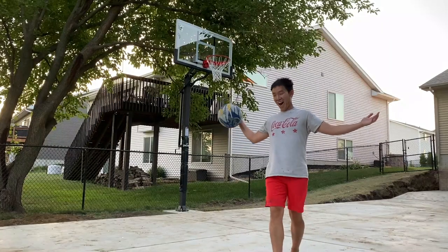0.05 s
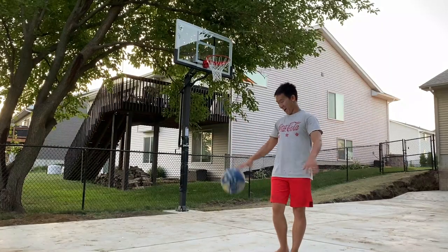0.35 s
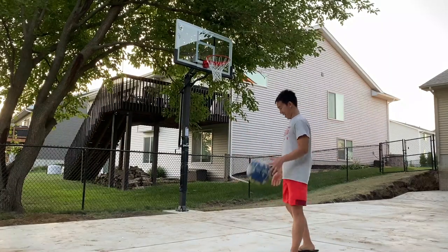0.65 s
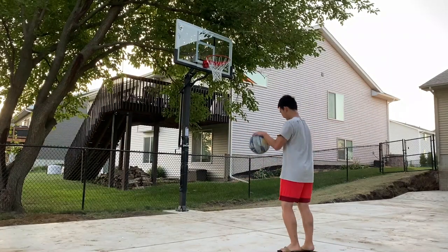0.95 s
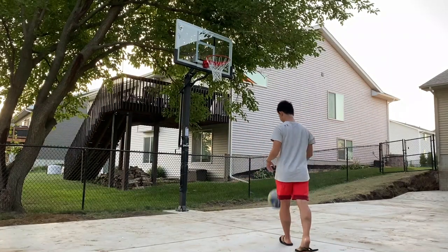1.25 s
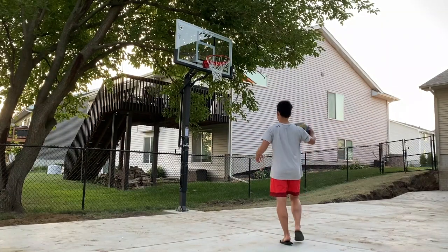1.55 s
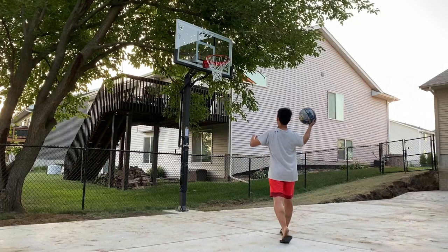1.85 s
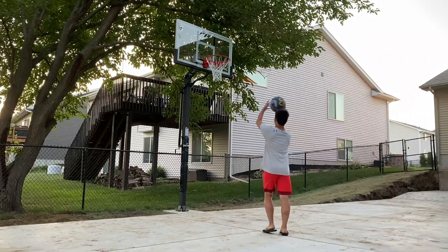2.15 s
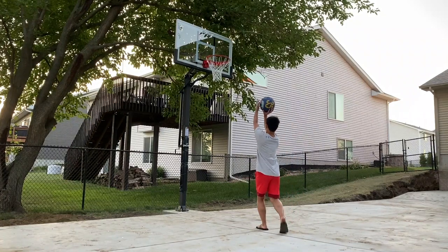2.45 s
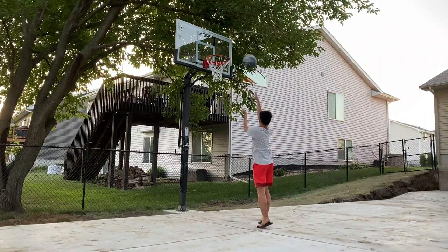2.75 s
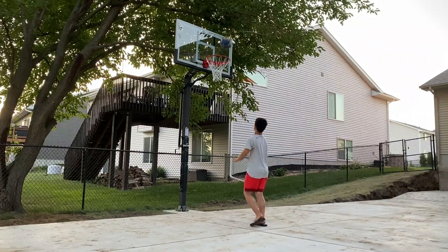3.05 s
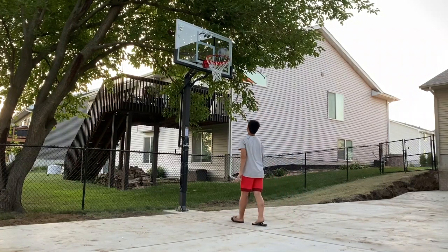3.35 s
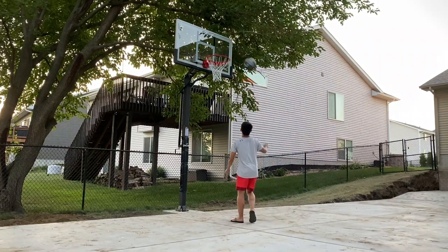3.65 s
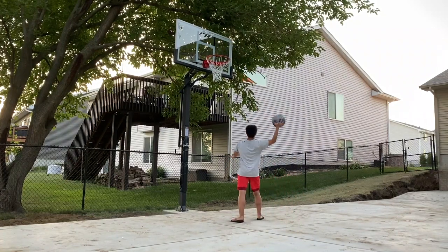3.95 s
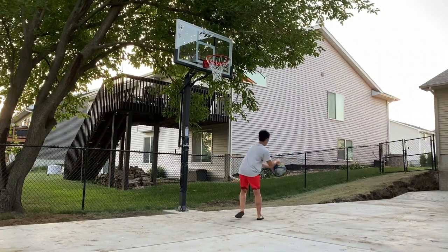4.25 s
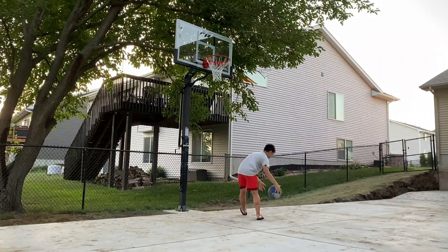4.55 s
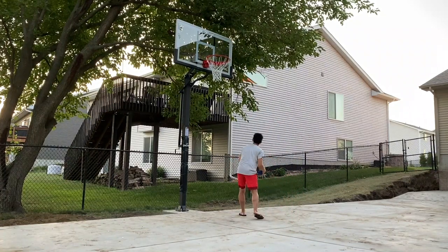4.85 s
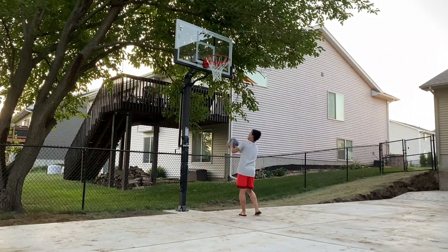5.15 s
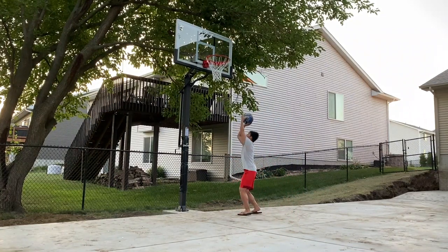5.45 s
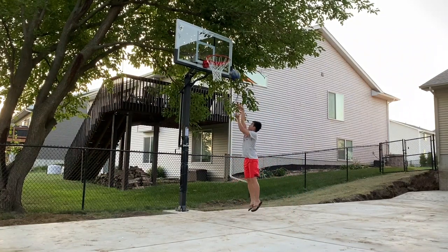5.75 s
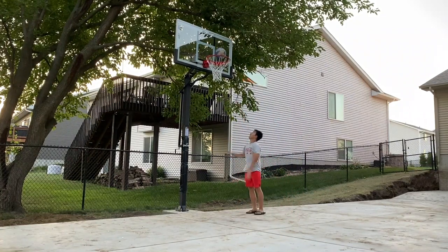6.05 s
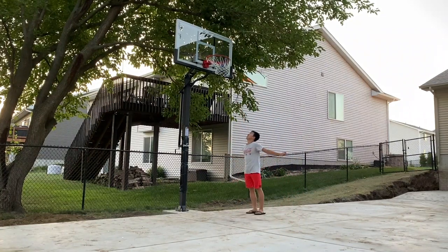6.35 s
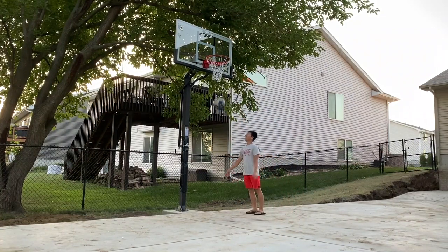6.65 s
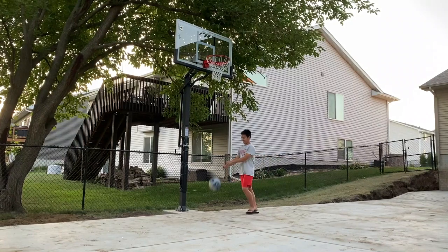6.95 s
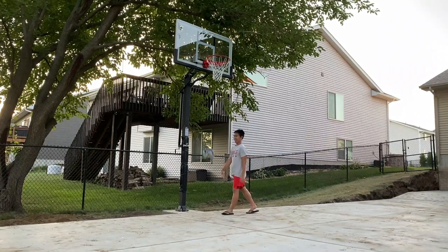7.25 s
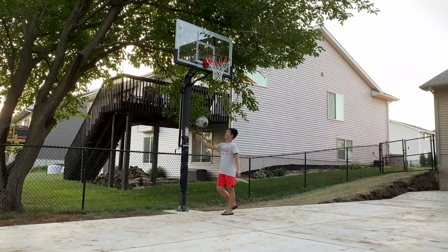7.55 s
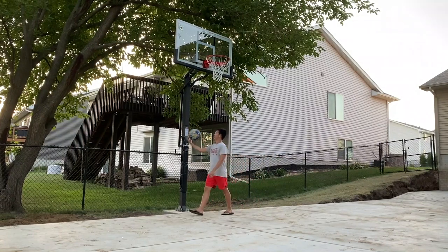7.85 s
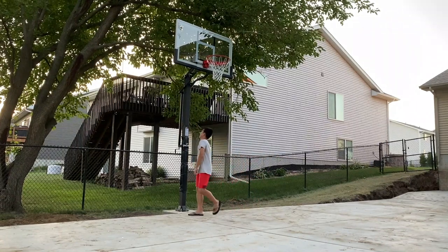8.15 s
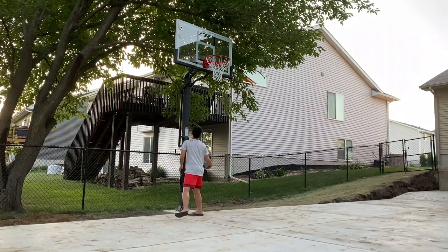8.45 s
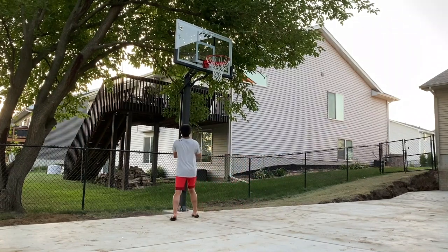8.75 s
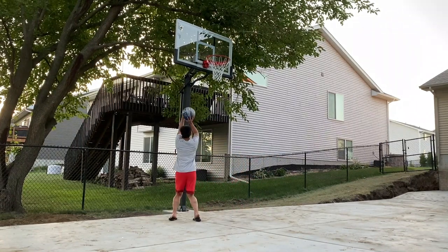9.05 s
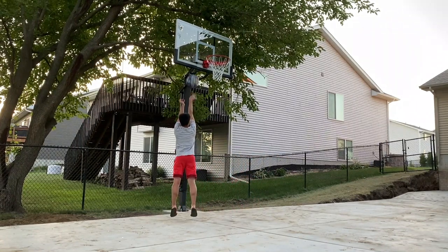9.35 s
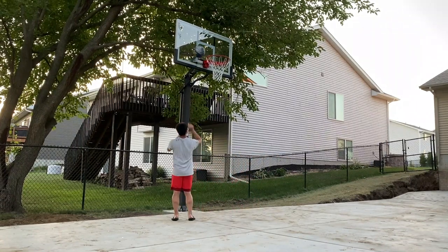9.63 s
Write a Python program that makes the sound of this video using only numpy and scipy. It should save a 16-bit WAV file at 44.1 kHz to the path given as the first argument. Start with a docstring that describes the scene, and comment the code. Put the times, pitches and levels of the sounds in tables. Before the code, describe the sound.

A basketball bounces on concrete and rattles a hoop, with sandals slapping and scuffing and a songbird whistling in a backyard.

```python
"""Back-yard basketball

A stereo microphone stands by a concrete pad, a few metres from a player who dribbles and shoots three
times. The ball cracks, thumps and rings inside; the hoop shudders and chatters; sandals slap and scuff.
House walls throw back each bounce. A songbird whistles falling notes from the trees, and behind it
lie a thin hiss of leaves, the rumble of distant traffic and one humming engine."""
import sys
import numpy as np
from scipy import signal
from scipy.fft import rfft, irfft, next_fast_len
from scipy.io import wavfile

SR = 44100
rng = np.random.default_rng(int(sys.argv[2]) if len(sys.argv) > 2 else 0)


def waveform_to_disk(signal):
    """Save audio, clipped to [-1, 1], as 16-bit WAV at the path in sys.argv[1]."""
    frames = np.transpose(np.atleast_2d(signal))
    scaled = np.clip(frames, -1, 1) * 32767
    samples = np.round(scaled).astype(np.int16)
    wavfile.write(sys.argv[1], SR, samples)


N = 436149
T = np.arange(N) / SR
BLOW = T[:SR // 2]   # time since a contact [s]

# Levels are relative within each table; the functions set the balance.
# distant traffic: (frequency [Hz], spectral density [dB])
TRAFFIC_SPECTRUM = [(13, -59), (22, -18), (30, -53), (42, -2), (91, 3), (108, -4), (139, -4), (183, -4.5),
                    (211, -9.5), (312, -23), (500, -21.5), (650, -35), (1100, -120)]
# its slow swell: (time [s], level [dB])
TRAFFIC_LEVEL = [(0, -64), (2.5, -62), (5.2, -64), (6.6, -60), (7.6, -59), (8.2, -61.5), (9.89, -58.5)]
# leaves and far hiss: (frequency [Hz], spectral density [dB])
LEAF_SPECTRUM = [(180, -24), (300, 2.5), (762, -8), (1030, -6.5), (1140, -11.5), (1720, -15), (2650, -16),
                 (3520, -8.5), (4670, -10.5), (5160, -9.5), (6300, -14.5), (7440, -25), (11300, -40),
                 (12700, -43), (16000, -64)]
# one far engine: (time [s], pitch [Hz], level [dB])
ENGINE_HUM = [(0, 112, -69), (2, 115, -61), (5, 116, -60.5), (7.5, 109.6, -64), (8.05, 97.3, -53.5),
              (8.751, 109.7, -53), (9.3, 108.7, -60.5)]

# the bird's flourish, up, down and up; a bend under 1 glides fastest at first:
# (delay [s], length [s], start [Hz], end [Hz], bend [exponent], level [dB])
FLOURISH_NOTES = [(0, .05, 4040, 5190, .6, -3), (.045, .045, 4300, 2898, .6, 0.5),
                  (.102, .05, 2850, 3850, .9, -3)]
# flourishes from the trees: (time [s], level [dB])
FLOURISH_CALLS = [(1.441, -55), (2.944, -53.5), (6.82, -55), (7.72, -63.5)]
# a chip dips and curls up: (delay [s], length [s], start [Hz], end [Hz], bend [exponent], level [dB])
CHIP_NOTES = [(0, .04, 3950, 3000, .9, -5), (.06, .065, 3100, 4050, 0.99, -1.5)]
# chips from the trees: (time [s], level [dB])
CHIP_CALLS = [(.76, -63), (2.49, -65), (5.07, -71), (6.63, -63), (9.51, -56)]
# a slur's high head and falling tail: (delay [s], length [s], start [Hz], end [Hz], bend [exponent])
SLUR_HEAD, SLUR_TAIL = (0, .36, 3831, 2850, .34), (.225, .205, 2930, 1830, 1.05)
# long slurs: (time [s], pitch [ratio], head [dB], tail [dB])
SLUR_CALLS = [(1.64, 0.98, -69.5, -63.5), (7.09, .98, -67, -63.5), (7.802, 1.03, -54, -57)]
# short falling whistles: (time [s], length [s], level [dB])
WHISTLE_CALLS = [(2.306, 0.15, -64.5), (2.674, .115, -65), (3.007, 0.14, -63), (8.406, 0.16, -57),
                 (8.733, 0.22, -58), (9.05, .2, -56.5), (9.369, 0.15, -57)]

# scatter from fence, deck and trees: (band centre [Hz], level [dB], t60 [s])
YARD_SCATTER = [(60, -11.5, 0.96), (118, -17, 0.39), (250, -16.5, .4), (496, -14.5, 0.2), (990, -18, 0.38),
                (2000, -15.5, 0.46), (3980, -14.5, .42), (7850, -7.5, 0.4), (16000, -21, .22)]
# echoes off the house walls: (delay [s], level [dB], cut-off [Hz], left over right [dB])
WALL_ECHOES = [(0.031, -28.5, 1497, 1.5), (0.044, -31, 3070, 14.5), (.055, -24.5, 1240, -10),
               (.068, -22, 925, 9.5), (.103, -26, 400, 1.5), (0.143, -52.5, 1200, 11)]
# the ball moves off towards the hoop: (time [s], distance from the microphone [m])
BALL_DISTANCE = [(.5, 3.16), (1.2, 3.9), (7, 4.5)]

# sand under a sole: (frequency [Hz], spectral density [dB])
GRIT_SPECTRUM = [(150, -43), (250, 0), (444, 2.5), (686, -5.5), (1020, -0.5), (2570, 0), (7310, -8),
                 (8400, -11), (11300, -11), (13200, -11), (14700, -13.5), (16000, -5)]
# soles dragged over grit: (time of hardest push [s], length [s], level [dB], brightness [dB])
SOLE_DRAGS = [(0.05, 0.096, -50, 7.5), (.743, .13, -56, 7.5), (2.24, .013, -53, 7),
              (2.684, 0.053, -57.5, 2.5), (3.017, .06, -61.5, 6.5), (3.285, .13, -45.5, -5.5),
              (3.525, 0.036, -61.5, -1), (3.721, 0.068, -58, 7), (3.942, 0.065, -55, 9.5),
              (4.154, 0.079, -50, 7.5), (4.776, 0.18, -62.5, 6.5), (5.264, 0.085, -53.5, 3),
              (5.347, 0.076, -41, -17), (5.551, 0.037, -46, -2), (7.924, .05, -62, 2),
              (8.031, 0.048, -61, 3), (8.572, 0.045, -58, 5), (8.696, 0.19, -56.5, -7),
              (9.014, .032, -48, 6.5), (9.516, .045, -55.5, -3)]
# the player shifts his feet: (start [s], end [s])
SHUFFLE_SPANS = [(3.4, 5.0), (8.6, 9.1)]
# sandals landing on the pad: (time [s], slap [dB], slap pitch [Hz], skid [dB])
FOOTFALLS = [(.655, -42.5, 690, -71), (1.318, -37, 470, -49.5), (1.893, -47, 1825, -61),
             (1.997, -45.5, 500, -77.5), (2.204, -43.5, 750, -71), (2.54, -39, 606, -78),
             (2.775, -49, 2090, -55.5), (2.841, -32, 1000, -48.5), (2.896, -43.5, 744, -64),
             (3.194, -37, 2620, -50.5), (3.79, -39, 1740, -63), (3.84, -48, 1890, -57),
             (4.891, -50, 2260, -70), (5.294, -34, 905, -57), (5.374, -28.5, 814, -62),
             (5.395, -28, 970, -71), (5.595, -39.5, 490, -66), (5.858, -46, 895, -63.5),
             (5.913, -34.5, 1910, -65), (8.654, -43, 427, -66.5), (8.775, -45, 2190, -61),
             (8.991, -41, 1440, -62), (9.268, -48, 1840, -60), (9.483, -39, 1360, -58.5)]

# modes of board and pole: (frequency [Hz], level [dB], t60 [s])
FRAME_MODES = [(98.24, 0.5, 0.62), (115, 4, 0.143), (165.4, -3, 0.29), (228, -0.5, 0.071),
               (309, -16.5, 0.13), (439, 3.5, 0.036)]
# modes of the rim: (frequency [Hz], level [dB], t60 [s])
RIM_MODES = [(662, 5.5, 0.065), (1050, -13, 0.17), (1183, 11, 0.053), (1500, -11, 0.094), (2070, -5, 0.062),
             (2470, 2, 0.018)]
# modes of the bracket and its springs: (frequency [Hz], level [dB], t60 [s])
BRACKET_MODES = [(2900, -5, 0.13), (3074, -1, 0.14), (3220, -2.5, 0.12), (3530, 3, 0.028),
                 (6400, -21, 0.051)]
# ball on the hoop: (time [s], frame [dB], rim [dB], bracket [dB], rattle [dB], rattle decay [s])
HOOP_STRIKES = [(3.282, -34, -34, -38, -54, .015), (3.292, -33, -42, -55, -40, 0.023),
                (3.34, -31.5, -48, -65, -47, 0.064), (5.974, -35, -52, -31.5, -60, 0.013),
                (6.265, -58, -56, -74.5, -57.5, 0.084), (9.663, -32.5, -60.5, -39, -36, 0.0073)]

# modes of the ball's skin under a palm: (frequency [Hz], level [dB], t60 [s])
SKIN_MODES = [(440, -5.5, 0.0265), (665, -7, 0.018), (1060, -10, .015), (1210, 3.5, 0.021),
              (1550, -2, 0.008), (1800, -9, .012), (2430, -19, .012)]
# modes of the air inside the ball: (frequency [Hz], level [dB], t60 [s])
CAVITY_MODES = [(997, -27.5, 0.29), (1610, -44, 0.23), (2120, -48, .2), (2687, -45.5, .25),
                (3460, -41, 0.32), (3550, -37.5, 0.21)]
# hands on the ball: (time [s], level [dB], air ring [dB])
HAND_TOUCHES = [(.720, -33, -4), (.734, -39, -10), (1.162, -46, -7), (3.971, -29, -9), (3.98, -24.5, -12),
                (4.1884, -16.5, -23), (4.418, -44.5, -16), (8.132, -45, -19)]
# ball on concrete: (time [s], level [dB], top snap [dB], shell wave [dB], shell wave [Hz], lift-off [dB])
BALL_BOUNCES = [(0.4979, -7.5, -30.5, -1, 1010, -4), (1.1993, -8.5, -12, 6.5, 989, -4),
                (4.4898, -14.5, -17.5, 4.5, 935, 1), (7.0657, -10, -9.5, 6, 828, 2)]


def from_db(db):
    return 10 ** (np.asarray(db) / 20)


def rms_one(x):
    return x / np.sqrt(np.mean(x ** 2) + 1e-20)


def peak_one(x):
    return x / np.abs(x).max()


def cut(x, hz, kind, order=2):
    """Butterworth low-, high- or band-pass."""
    sections = signal.butter(order, np.clip(hz, 10, .48 * SR), kind, fs=SR, output="sos")
    return signal.sosfilt(sections, x + 1e-18)


def add(track, s, sound):
    """Mixes a sound into a track from time s on."""
    start = max(round(s * SR), 0)
    track[start:start + len(sound)] += sound[:len(track) - start]


def stereo_noise(size, alike):
    """Two white noises with a share in common."""
    return np.sqrt(alike) * rng.standard_normal(size) + np.sqrt(1 - alike) * rng.standard_normal((2, size))


def filtered_noise(size, hz, kind):
    """Steady noise through one filter; rms 1."""
    return rms_one(cut(rng.standard_normal(size), hz, kind))


def colour(x, spectrum):
    """Gives a steady noise its spectrum, rolled off beyond both ends; rms 1."""
    hz, db = np.transpose(spectrum)
    size = next_fast_len(N)
    bins = np.maximum(np.fft.rfftfreq(size, 1 / SR), 1)
    gain = from_db(np.interp(np.log(bins), np.log(hz), db))
    roll_off = np.minimum(bins / hz[0], 1) ** 2 * np.minimum(hz[-1] / bins, 1) ** 2
    return rms_one(irfft(rfft(x, size) * gain * roll_off, size)[..., :N])


def ring(modes):
    """Decaying sines, with new strengths at every blow."""
    return sum(from_db(db + rng.normal(0, 1.2) - 60 * BLOW / t60) * np.sin(2 * np.pi * hz * BLOW)
               for hz, db, t60 in modes)


def burst(decay_s):
    """Noise that dies quickly."""
    return rng.standard_normal(len(BLOW)) * np.exp(-BLOW / decay_s)


def swell(centre_s, width_s):
    """A bell-shaped push that starts from rest."""
    return np.exp(-((BLOW - centre_s) / width_s) ** 2) * np.minimum(BLOW * 1000, 1)


def glide(start_hz, end_hz, settle_s):
    """A wave whose pitch sinks."""
    pitch = end_hz + (start_hz - end_hz) * np.exp(-BLOW / settle_s)
    return np.cos(2 * np.pi * np.cumsum(pitch) / SR)


def traffic():
    """Far traffic rumbles, nearly alike on both sides of the microphone."""
    level = from_db(np.interp(T, *np.transpose(TRAFFIC_LEVEL)) + 5.5)
    return level * colour(stereo_noise(N, alike=.93), TRAFFIC_SPECTRUM)


def leaves():
    """A thin, wide hiss of leaves all round the yard."""
    hiss = colour(stereo_noise(N, alike=.045), LEAF_SPECTRUM)
    return from_db(-64.5) * cut(hiss, 300, "high", order=1)


def far_engine(octave_db=-9, unsteady_hz=3):
    """A far engine hums, its speed wandering."""
    s, hz, db = np.transpose(ENGINE_HUM)
    wander = np.interp(T, np.arange(100) / 10, rng.standard_normal(100))
    phase = 2 * np.pi * np.cumsum(np.interp(T, s, hz) + unsteady_hz * wander) / SR
    return from_db(np.interp(T, s, db)) * (np.sin(phase) + from_db(octave_db) * np.sin(2 * phase))


def bird_notes(top_hz=3454, drop_hz=2030, drop_s=.2, whistle_bend=.45):
    """The song as glides: (time [s], length [s], start [Hz], end [Hz], bend [exponent], level [dB])."""
    notes = []
    for syllable, calls in ((FLOURISH_NOTES, FLOURISH_CALLS), (CHIP_NOTES, CHIP_CALLS)):
        for s, db in calls:
            notes += [(s + delay_s, *shape, db + part_db) for delay_s, *shape, part_db in syllable]
    for s, ratio, *levels in SLUR_CALLS:
        for (delay_s, length_s, start_hz, end_hz, bend), db in zip((SLUR_HEAD, SLUR_TAIL), levels):
            notes.append((s + delay_s, length_s, ratio * start_hz, ratio * end_hz, bend, db))
    for s, length_s, db in WHISTLE_CALLS:   # all follow one fall; longer ones get lower
        end_hz = top_hz - drop_hz * (length_s / drop_s) ** whistle_bend
        notes.append((s, length_s, top_hz, end_hz, whistle_bend, db))
    return notes


def bird(trees_t60_s=.53, build_s=.015, fade_db=7, waver=.014, clear_note_s=.08):
    """Nearly pure whistles, smeared by the trees; short notes reach the microphone mostly as scatter."""
    song, direct = np.zeros(N), np.zeros(N)
    for s, length_s, start_hz, end_hz, bend, db in bird_notes():
        progress = np.linspace(0, 1, int(length_s * SR))
        pitch = start_hz + (end_hz - start_hz) * progress ** bend
        pitch *= 1 + waver * filtered_noise(len(progress), 198.5, "low")
        phase = 2 * np.pi * np.cumsum(pitch) / SR
        edges = np.minimum(np.minimum(progress, 1 - progress) * 14, 1)
        effort = edges * from_db(db + fade_db * (.5 - progress))
        note = effort * (np.sin(phase) + from_db(-33) * np.sin(2 * phase))
        add(song, s, note)
        add(direct, s, note * min(length_s / clear_note_s, 1))
    t = T[:SR]
    trees = stereo_noise(SR, alike=.3) * from_db(-60 * t / trees_t60_s) * (1 - np.exp(-t / build_s))
    trees /= np.linalg.norm(trees[0])
    add(direct, .038, from_db(-10.5) * direct)   # the house wall repeats each note
    return from_db(-2) * direct + from_db(1) * signal.fftconvolve(song[None], trees)[:, :N]


def yard(x, build_s=.028):
    """The yard answers with a few dull wall echoes and a scattered tail that lasts longest in the bass."""
    t, response = T[:SR], np.zeros((2, SR))
    for hz, db, t60 in YARD_SCATTER:
        tail = from_db(-60 * t / t60) * (1 - np.exp(-(t / build_s) ** 2))
        band = cut(stereo_noise(SR, alike=.18), [hz / np.sqrt(2), hz * np.sqrt(2)], "band")
        response += from_db(db) * band * tail / np.linalg.norm(tail)
    for delay_s, db, wall_hz, pan_db in WALL_ECHOES:
        echo = cut(signal.unit_impulse(len(BLOW)), wall_hz, "low", order=1)
        add(response[0], delay_s, from_db(db + pan_db / 2) * echo)
        add(response[1], delay_s, from_db(db - pan_db / 2) * echo)
    return signal.fftconvolve(x[None], response)[:, :N]


def near_ground(x, scatter_db=-12, spread_s=.006):
    """Rough concrete close to the microphone scatters each sound differently into its two ports."""
    scatter = stereo_noise(SR // 20, alike=0) * np.exp(-T[:SR // 20] / spread_s)
    response = cut(scatter, [250, 5000], "band", order=1)
    response /= np.linalg.norm(response[0])
    return from_db(scatter_db) * signal.fftconvolve(x[None], response)[:, :N]


def sole_slides(skid_lag_s=.011, rise_s=.013, fall_s=.036, rise_share=.37, shuffle_gap_s=.2):
    """Skids, drags and faint shuffles: (time [s], rise [s], fall [s], level [dB], brightness [dB])."""
    skids = [(s + skid_lag_s, rise_s, fall_s, db, -2) for s, _, _, db in FOOTFALLS]
    drags = [(s, rise_share * length_s, (1 - rise_share) * length_s, db, bright_db)
             for s, length_s, db, bright_db in SOLE_DRAGS]
    shuffles = [(s + shuffle_gap_s * rng.random() / 2, rise_s, fall_s, rng.normal(-68, 1), 5.5)
                for start, end in SHUFFLE_SPANS for s in np.arange(start, end, shuffle_gap_s)]
    return skids + drags + shuffles


def scuffs(grains_per_s=7000, grain_db=1.5, clump_db=3, clump_hz=70, bright_hz=4500, hollow_db=-10):
    """Sand grains break loose in clumps under a sliding sole; each stroke has its own hollow pitch."""
    clumps = from_db(clump_db * np.clip(filtered_noise(N, clump_hz, "low"), -2, 2))
    strengths = rng.standard_normal(N) * from_db(grain_db * np.minimum(rng.exponential(1, N), 5))
    breaks_loose = rng.random(N) < grains_per_s / SR
    scrape = colour(clumps * strengths * breaks_loose, GRIT_SPECTRUM)
    treble = cut(scrape, bright_hz, "high", order=1)
    out = np.zeros(N)
    for s, rise_s, fall_s, db, bright_db in sole_slides():
        span = slice(max(int((s - .4) * SR), 0), int((s + .4) * SR))
        t = T[span] - s
        push = np.exp(-np.where(t < 0, (t / rise_s) ** 2, np.abs(t / fall_s) ** 1.4))
        resonance = signal.iirpeak(rng.uniform(1500, 2900), Q=6, fs=SR)
        hollow = from_db(hollow_db) * rms_one(signal.lfilter(*resonance, scrape[span]))
        out[span] += from_db(db) * push * (scrape[span] + (from_db(bright_db) - 1) * treble[span] + hollow)
    return out


def sandal_slaps(snap_db=-11, snap_db_per_octave=5):
    """A foam sole claps against heel or ground: a crisp snap, then a puff of trapped air."""
    out = np.zeros(N)
    for s, db, hz, _ in FOOTFALLS:
        puff = peak_one(cut(burst(.0033), [.55 * hz, 1.5 * hz], "band"))
        snap = peak_one(cut(burst(.00095), [1000, 7000], "band"))
        # the less air a sole traps, the higher and crisper its slap
        crispness = from_db(snap_db + snap_db_per_octave * np.log2(hz / 1000))
        add(out, s, from_db(db + 1) * peak_one(puff + crispness * snap))
    return out


def rattling(modes):
    """Loosely bolted parts: each mode rings as a narrow band of dying noise."""
    out = 0
    for hz, db, t60 in modes:
        band = cut(rng.standard_normal(SR), [.96 * hz, 1.04 * hz], "band", order=1)[-len(BLOW):]
        out = out + from_db(db - 60 * BLOW / t60) * rms_one(band)
    return out


def hoop(frame_rise_s=.0082, metal_rise_s=.00047):
    """Across the pad the ball shakes board and pole; rim and bracket chatter for a moment."""
    out = np.zeros(N)
    frame_envelope = (1 - BLOW / BLOW[-1]) * (1 - np.exp(-BLOW / frame_rise_s))
    metal_onset = 1 - np.exp(-BLOW / metal_rise_s)
    for s, frame_db, rim_db, bracket_db, rattle_db, rattle_s in HOOP_STRIKES:
        frame = from_db(frame_db) * ring(FRAME_MODES) * frame_envelope
        rim = from_db(rim_db) * rattling(RIM_MODES)
        bracket = from_db(bracket_db) * (rattling(BRACKET_MODES) + ring(BRACKET_MODES)) / 2
        clatter = cut(burst(rattle_s), [250, 1700], "band", order=1)
        rattle = from_db(rattle_db + 12) * cut(clatter, 1580, "low")
        add(out, s, frame + (from_db(-7) * (rim + bracket) + rattle) * metal_onset)
    return out


def hands(fingers_s=.0062, medium_db=-28.5, medium_hz=1400, db_per_octave=22):
    """Fingers land one after another on the skin, the palm presses it in, and the air inside rings."""
    out = np.zeros(N)
    for s, db, ring_db in HAND_TOUCHES:
        force_db = db - medium_db   # harder touches are brighter, with a smaller share of push
        contact_hz = medium_hz * 2 ** (force_db / db_per_octave)
        fingers = rng.standard_normal(len(BLOW)) * swell(fingers_s, .005)
        skin = signal.fftconvolve(ring(SKIN_MODES), fingers)[:len(BLOW)]
        slap = peak_one(skin) + from_db(-10) * cut(fingers, [300, 3000], "band", order=1)
        push = from_db(-9 - .25 * force_db) * glide(800, 130, .005) * swell(.012, .009)
        air = from_db(ring_db + 11.5) * ring(CAVITY_MODES) * (1 - np.exp(-BLOW / fingers_s))
        add(out, s, from_db(db) * cut(slap + push + air, contact_hz, "low", order=1))
    return out


def rubber_crack(snap_db):
    """Rubber strikes gritty concrete, and the pebbled skin rings for a few cycles."""
    click = signal.unit_impulse(len(BLOW))
    crack = 2 * cut(cut(click, [1400, 3700], "band"), 550, "high", order=1)
    snap = from_db(snap_db) * cut(click, 8500, "high")
    skin = ring([(1930, -24.5, .0077), (3090, -25.5, .0021)])
    grit = cut(burst(.0016), [900, 5500], "band", order=1)
    return from_db(12) * (crack + snap + skin) + from_db(-19) * grit


def bounces(crack_follows=.27, squash_follows=.45):
    """The ball cracks on the pad, a bending wave runs round the shell, the ball squashes and lifts off."""
    out = np.zeros(N)
    for s, db, snap_db, wave_db, wave_hz, lift_db in BALL_BOUNCES:
        # a livelier shell wave comes with more crack and more squash
        crack = from_db(crack_follows * wave_db) * rubber_crack(snap_db)
        wave = from_db(wave_db - 12) * glide(1.9 * wave_hz, .35 * wave_hz, .0039) * swell(.0036, .0032)
        # the whole ball is pressed flat and springs back: one short, sinking thump
        thump = -from_db(-1.5) * glide(225, 70, .011) * swell(.014, .0076)
        squash_tone = glide(480, 210, .0074) * swell(.012, .011)
        squash_noise = .33 * filtered_noise(len(BLOW), [300, 600], "band") * swell(.014, .013)
        squash = from_db(squash_follows * wave_db - 14.5) * (squash_tone + squash_noise)
        # the flattened patch flaps out as the ball leaves the ground
        flap_tone = glide(1500, 950, .011) * swell(.012, .002186)
        flap_noise = .37 * filtered_noise(len(BLOW), [700, 1800], "band") * swell(.014, .004)
        flap = from_db(lift_db - 9.5) * (flap_tone + flap_noise)
        flutter = from_db(-24) * cut(burst(.011), [400, 2600], "band", order=1)
        air = from_db(-13.5) * ring(CAVITY_MODES)
        add(out, s, from_db(db) * (crack + wave + thump + squash + flap + flutter + air))
    return out


def scene(lowest_hz=42, yard_reach_m=3.1):
    """Ball, player and hoop sound into the yard; the farther from the microphone, the more echo."""
    sources = np.array([bounces(), hands() + sandal_slaps() + scuffs(), hoop()])
    ball, player, basket = cut(sources, lowest_hz, "high", order=1)
    direct = ball + player + basket
    left = np.interp(np.arange(N) - 1, np.arange(N), direct)   # reaches the left port one sample later
    ball_send = ball * np.interp(T, *np.transpose(BALL_DISTANCE)) / yard_reach_m
    # low sounds bend round the player's body and reach more of the walls
    player_send = from_db(-3) * player + from_db(3) * cut(player, 410, "low", order=1)
    echoes = yard(ball_send + player_send + from_db(7.5) * basket)
    game = np.array([left, direct]) + near_ground(direct) + echoes
    return game + bird() + traffic() + leaves() + far_engine()


def record(dry, left_bass_db=-7, shelf_hz=2500, cutoff_hz=15900):
    """The microphone's left port is weaker in the bass; both have two high notches; the top is cut."""
    left = dry[0] + (from_db(left_bass_db) - 1) * cut(dry[0], shelf_hz, "low", order=1)
    ports = np.array([left, dry[1]])
    for notch_hz, q in ((13500, 6), (8400, 12)):
        ports = signal.lfilter(*signal.iirnotch(notch_hz, q, fs=SR), ports)
    return signal.sosfilt(signal.ellip(10, .1, 80, cutoff_hz, fs=SR, output="sos"), ports)


dry = scene()
out = record(dry)
waveform_to_disk(out)
```